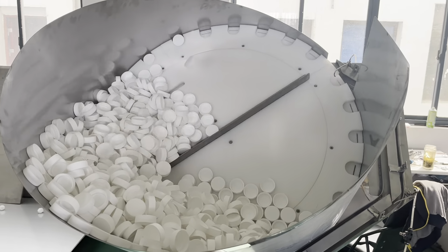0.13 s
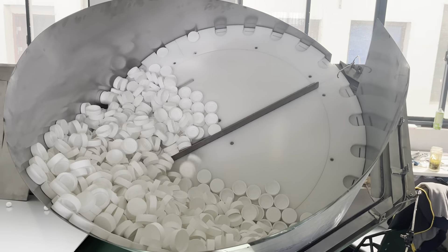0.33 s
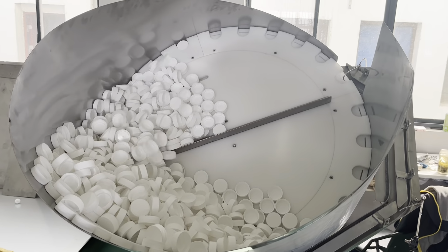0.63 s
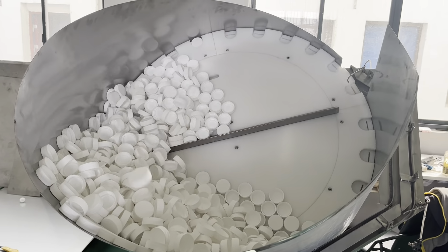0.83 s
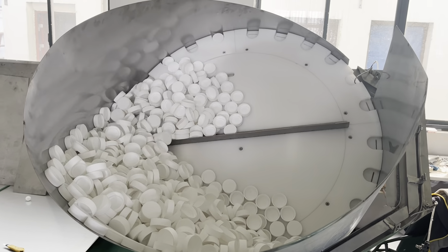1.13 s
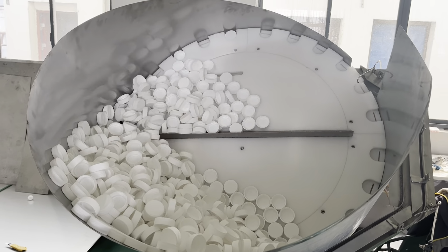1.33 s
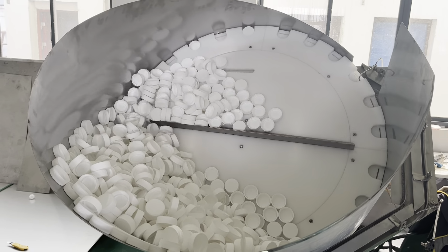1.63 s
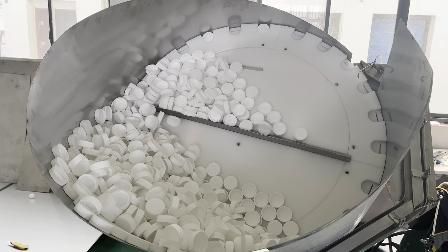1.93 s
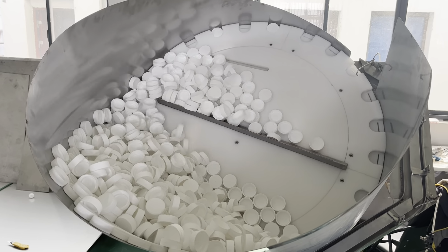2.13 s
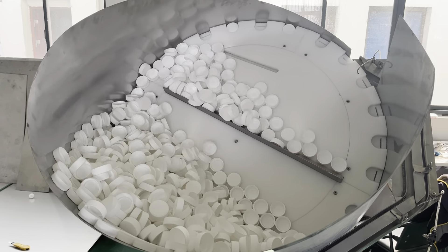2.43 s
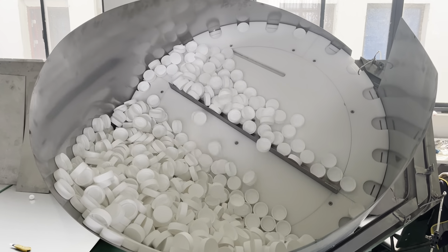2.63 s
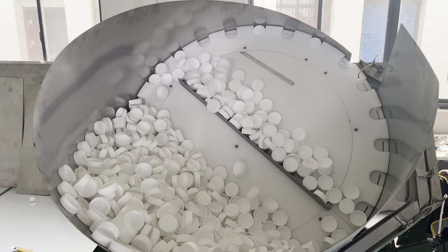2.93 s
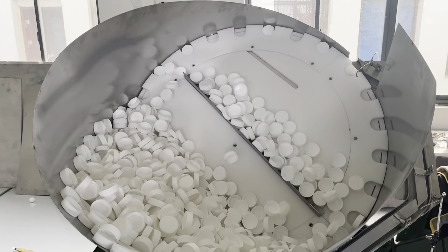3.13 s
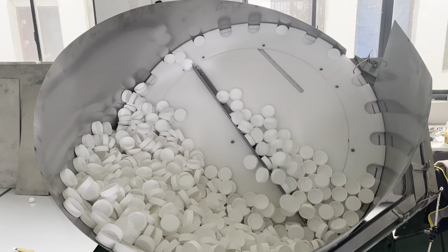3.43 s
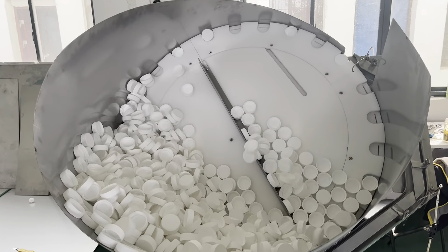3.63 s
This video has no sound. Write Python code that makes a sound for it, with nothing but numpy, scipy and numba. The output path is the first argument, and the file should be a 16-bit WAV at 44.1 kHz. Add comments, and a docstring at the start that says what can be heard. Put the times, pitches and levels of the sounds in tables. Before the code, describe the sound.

Plastic caps click and tumble in a metal feeder over steady hiss, machine drone and air puffs twice a second. Low wind buffeting peaks around one second, then a dense cap cascade; close phone microphone, short room echo.

```python
"""A pulsing air jet, a steady hiss and plastic caps rattling in a steel bowl are heard from the start.
A slowly turning tilted disc tumbles the caps: hundreds of small taps a second, each a short dying sine,
with single drops, sharp ticks and dull knocks on top. The air and the workshop's drone are coloured noise.
The drive whines as two faint sines, and gusts buffet the two ports of a phone held close by as low noise
and thumps."""
import sys
import numpy as np
from scipy import signal
from scipy.fft import rfft, irfft, next_fast_len
from scipy.io import wavfile
from scipy.ndimage import uniform_filter1d
from numba import njit

SR = 44100
rng = np.random.default_rng(int(sys.argv[2]) if len(sys.argv) > 2 else 0)


def dump(signal):
    """Clip the signal to [-1, 1] and save it as 16-bit WAV at the path in sys.argv[1]."""
    limited = np.clip(np.atleast_2d(signal).T, -1, 1)
    pcm = np.round(limited * 32767).astype(np.int16)
    wavfile.write(sys.argv[1], SR, pcm)


N = 167139  # length in samples

# steady hiss and workshop drone, coloured by pitch: (frequency [Hz], relative level [dB per Hz])
DRONE_COLOUR = [(30, -21), (70, -8.5), (140, -10.5), (210, -6.5), (300, -8), (500, -11.5), (800, -14.5),
                (1250, -8), (1550, -11), (1750, -10.5), (2100, -13.5), (2700, -10), (3000, -11),
                (5800, -15.5), (8300, -18), (11400, -12.5), (14500, -22), (16000, -14)]
DRONE_DB, DRONE_SWELL_DB, DRONE_FLICKER_DB = -25, -0.16, 1.5
# level of the high treble: (time [s], level [dB])
TREBLE_LEVEL = [(0.0, -33), (0.02, -32), (0.45, -23.5), (0.46, -31), (1.17, -25), (1.23, -35), (1.42, -28),
                (1.7, -31), (2.12, -25.5), (2.25, -28.5), (2.53, -24), (2.57, -34), (2.79, -32),
                (2.86, -26), (3.18, -34), (3.66, -27), (3.76, -43), (3.79, -32)]
TREBLE_HZ, TREBLE_WIDTH_HZ = 14360, 4000
# drive whine before it wavers and swells: (pitch [Hz], rms level [dB])
WHINE_TONES = [(2713, -42.5), (5426, -54)]
WHINE_WAVER_DB = -3
# slow rise and fall of the whine: (time [s], gain [dB])
WHINE_SWELL_LEVEL = [(0, 0), (1.1, -3), (1.4, 2.5), (2.8, 5.5), (3.79, -1)]

# pulsed air jet: (valve opens [s], valve starts to shut [s], level before waver [dB])
JET_PULSES = [(-.2, 0.032, -24.5), (0.204, 0.66, -24), (0.854, 1.204, -24.5), (1.385, 1.728, -25.5),
              (1.89, 2.246, -24), (2.394, 2.757, -26), (2.918, 3.282, -26), (3.434, 3.9, -26)]
JET_RISE_S, JET_FALL_S, JET_WAVER_DB = 0.03, 0.019, 0.94
# rushing air, coloured by pitch: (frequency [Hz], relative level [dB per Hz])
RUSHING_AIR_COLOUR = [(1000, -20), (2000, -14), (2700, 0), (3000, -13), (3250, 16), (3500, 14),
                      (3700, 10.5), (4400, 6), (5400, 6), (6500, 16), (7300, 18.5), (8400, -3), (9100, 11),
                      (10100, 13), (11300, 5), (13100, 6), (14200, -34), (16000, -39)]

# gusts at the phone: (time [s], level [dB])
GUST_LEVEL = [(0.0, -40), (0.1, -36), (0.15, -47), (0.17, -31), (0.24, -37), (0.28, -23.5), (0.34, -41),
              (0.36, -29.5), (0.58, -28.5), (0.61, -33), (0.71, -23.5), (0.75, -26), (0.79, -20.5),
              (0.86, -24), (0.98, -19.5), (1.02, -22), (1.04, -17), (1.15, -25), (1.19, -23.5), (1.29, -30),
              (1.33, -21.5), (1.5, -32), (1.57, -24.5), (1.76, -33.5), (1.79, -25), (1.87, -41), (2.3, -37),
              (2.35, -27), (2.41, -32), (2.57, -65), (2.88, -34), (3.07, -45), (3.21, -32.5), (3.27, -51),
              (3.42, -31), (3.45, -36), (3.6, -28), (3.68, -45), (3.73, -31.5), (3.79, -47)]
# gust noise, coloured by pitch: (frequency [Hz], relative level [dB per Hz])
GUST_NOISE_COLOUR = [(20, -27), (40, -10), (70, -3), (140, -6), (250, -17.5), (500, -43), (1500, -48)]
GUST_SKEW = 0.22  # how much harder a gust pushes than it pulls
# the hardest buffets: (time [s], starting level [dB], pitch [Hz])
GUST_THUMPS = [(.78, -12, 75), (0.932, -10, 68), (0.959, -7, 72.5), (1.036, -11.5, 75), (1.105, -17, 68.3),
               (1.179, -11, 65.4), (1.218, -19, 69), (0.689, -17, 70)]
THUMP_CYCLES = 11.5  # every count of cycles is the time to die by 60 dB

# loudness of the tumbling heap's main taps: (time [s], level [dB])
TUMBLE_LEVEL = [(0.0, -28), (0.18, -45), (0.24, -28), (0.26, -33.5), (0.76, -32), (0.8, -26), (0.83, -33),
                (1.375, -34.5), (1.39, -23), (1.4, -34), (1.98, -36.5), (2.0, -35), (2.15, -33.5),
                (2.25, -28), (2.27, -41), (2.33, -27), (2.34, -37), (3.11, -27), (3.13, -31), (3.15, -21),
                (3.19, -34), (3.22, -17.5), (3.25, -24), (3.27, -29), (3.3, -23), (3.35, -27),
                (3.39, -28.5), (3.54, -25), (3.62, -33.5), (3.72, -23), (3.76, -34), (3.79, -25)]
TAPS_PER_S, TAP_SPREAD_DB, TAP_MAX_DB = 800, 4.5, 10
TAP_HZ, TAP_HZ_SPREAD, TAP_LOWEST_HZ, TAP_CYCLES = 2335, 0.19, 1690, 15.4
TAP_BRIGHT_HZ, TAP_BRIGHT_DB = 4720, -12  # upper mode, strongest in hard taps
CONTACT_S = 0.00016
# the bowl's hollow answer to the sliding heap: (time [s], level [dB])
BOWL_LEVEL = [(0.0, -42), (0.32, -34), (0.57, -40), (0.6, -28), (0.94, -34), (1.31, -39), (1.33, -35),
              (1.36, -33), (1.69, -37), (1.91, -30.5), (1.97, -35.5), (2.41, -34.5), (2.5, -41.5),
              (2.65, -31.5), (2.72, -37), (2.75, -29.5), (2.93, -31), (2.97, -29), (3.2, -33), (3.21, -38),
              (3.22, -32), (3.27, -36), (3.29, -28.5), (3.37, -31.5), (3.62, -32.5), (3.79, -30)]
# pitches at which the bowl rings: (middle pitch [Hz], relative level [dB])
BOWL_RINGS = [(200, -7), (415, -3), (650, 1.5), (830, -4), (1030, -2.5), (1250, 0)]
BOWL_HZ_SPREAD, BOWL_CYCLES = 0.084, 17.6
BOWL_EVENNESS = 0.57  # 0 keeps the loud and soft taps apart, 1 makes them equal

# dull knocks, levels before contact softening and filtering:
# (time [s], level [dB], pitch [Hz], rattle against level [dB], overtones against level [dB])
DULL_KNOCKS = [(0.229, -15, 404, -3, -11), (0.534, -21.5, 225, -3, -1), (0.546, -17.5, 350, -11, -13),
               (0.601, -17.5, 436, 4.5, -2), (0.623, -16, 243, -11, -6), (0.662, -14, 594, -9, -12),
               (0.678, -20, 570, -8, -12), (0.791, -21.5, 318, 8, -10), (1.031, -22, 183, -8, -3),
               (1.07, -6.5, 164.5, -14, -2.5), (1.113, -22, 570, -10, -14), (1.164, -8, 158.4, -19, -9.5),
               (1.323, -9, 253, 0.5, -6), (1.534, -10, 249, -19, -6), (1.565, -11.5, 220, -21, -8),
               (1.628, -18, 250, -12, -7), (1.66, -16, 195, -14, -6.5), (1.738, -19, 220, -10, -10),
               (2.34, -14, 250, -8, -14), (2.35, -16, 150, -14, -3), (2.716, -19, 398, -3, -6),
               (2.811, -22, 190, -11, -13), (2.893, -23, 131, -10, -2), (3.205, -16.5, 655, 10.5, -5),
               (3.225, -21, 430, 8, -2), (3.283, -16, 660, 7, -1)]
KNOCK_CYCLES, KNOCK_CONTACT_S = 15.2, 0.0027
KNOCK_RATTLE_HZ, KNOCK_RATTLE_T60_S = 830, 0.18
# overtones of a knock: (multiple of its pitch, relative level [dB])
OVERTONES = [(1.6, -4), (2.5, -0.5), (3.7, -10)]
OVERTONE_CYCLES, OVERTONE_CONTACT_S = 15.7, 0.0014
# sharp ticks on the steel wall: (time [s], level before filtering [dB])
WALL_TICKS = [(0.2333, -19), (3.301, -10.5), (3.6447, -15)]
TICK_T60_S = 0.071
# single caps dropping, crack level before filtering:
# (time [s], starting level [dB], pitch [Hz], bright crack against level [dB])
CAP_DROPS = [(0.2205, -14, 2380, -3), (0.3647, -17, 2350, 5.5), (0.4279, -17.5, 2020, 5),
             (0.5731, -20, 2570, -6), (0.6558, -22, 2400, -8), (0.7272, -11.5, 1830, -13),
             (0.7874, -9.5, 2500, -4), (0.7989, -9, 2380, -2.5), (1.1682, -21, 2700, -6),
             (1.382, -11.5, 2160, 6), (1.3895, -11, 2500, -7), (1.4378, -14, 2640, -10),
             (1.4782, -15, 2700, -9), (1.498, -13, 2680, -4), (1.582, -24, 2710, -8),
             (1.6277, -15, 2300, -13), (1.9015, -12.5, 3360, -4), (1.9992, -11, 2440, -13),
             (2.0362, -12, 2760, -7), (2.05, -9, 4930, -8), (2.0745, -14.5, 2740, 2.5),
             (2.2202, -11, 2530, -7), (2.3291, -16, 2500, -3.5), (2.4427, -16, 3300, -7),
             (2.477, -15, 2590, -9), (2.6032, -14, 2510, -3), (2.6753, -18, 2720, 1),
             (2.832, -25, 2530, -6), (2.8458, -13.5, 2530, -11), (2.8858, -15, 2120, -5),
             (2.9033, -15, 2130, -6), (2.9253, -12, 2250, -11), (2.9608, -9, 2560, -7),
             (3.0127, -13, 1700, -2), (3.03, -12, 2500, -6), (3.0879, -20.5, 2400, -6),
             (3.102, -9.5, 2500, -14), (3.146, -3, 2320, -15), (3.2016, -8.5, 2240, -5),
             (3.209, -6.5, 1930, -9), (3.2165, -7, 2050, -12), (3.2275, -12, 2030, -10),
             (3.243, -14, 2300, -8), (3.2735, -9, 2280, -16), (3.285, -11, 1900, -11),
             (3.293, -10, 1770, -8), (3.306, -13, 2370, -1), (3.319, -11, 2380, -10),
             (3.3389, -12, 1930, -5), (3.3801, -25, 2120, -9), (3.4027, -15, 2280, -10),
             (3.4987, -15, 2040, -7), (3.5892, -17, 2770, -4), (3.6204, -17, 2680, 4), (3.67, -13, 2560, 2)]
CLACK_CYCLES, BOUNCE_S, BOUNCE_DB = 23.8, .0055, -5
SNAP_HZ, SNAP_CYCLES, SNAP_DB = 4300, 8.1, 3  # the first contact, dB against the crack

# how the two ports differ:
# (frequency [Hz], lead of the right [turns], likeness [0-1], left minus right [dB])
PHONE_PORTS = [(0, 0, .95, .3), (400, 0, .85, 3), (1100, -.05, .35, 3), (1300, -.6, .2, 2.5),
               (1600, -.6, .55, 2), (1750, -1, .93, .5), (2400, -1.03, .88, .5), (3100, -1.2, .65, 1),
               (4600, -1.12, .45, 1.5), (5200, -.95, .2, 1.5), (6000, -.82, .75, 1), (8400, -.5, .97, 0),
               (10100, -.25, .82, 0), (11900, 0, .97, 0), (13600, .25, .84, 0), (15500, .5, .97, 0),
               (22050, 1.4, .9, 0)]
SCATTER_T60_S, ROOM_T60_S, ROOM_DB = 0.067, 0.084, -6
LOW_CUT_HZ, TOP_HZ = 37, 15400


def undb(db):
    """Turn dB into a gain."""
    return 10 ** (np.asarray(db) / 20)


def unit(x):
    """Scale to an rms of 1."""
    return x / np.sqrt(np.mean(x ** 2))


def curve(rows):
    """Draw a gain line through (time [s], level [dB]) rows."""
    rows = np.array(rows)
    return undb(np.interp(np.arange(N) / SR, rows[:, 0], rows[:, 1]))


def walk(rate):
    """Wander smoothly: random levels held 1 / rate seconds, smoothed twice, with a spread near 1."""
    hold = int(SR / rate)
    steps = np.repeat(rng.standard_normal(N // hold + 1), hold)
    return 1.53 * uniform_filter1d(uniform_filter1d(steps, hold), hold)[:N]


def band(x, hz, width_hz):
    """Keep mostly the sound near one pitch, as a resonance does."""
    return signal.lfilter(*signal.iirpeak(hz, hz / width_hz, fs=SR), x)


def hiss(colour, flicker_db=0., rate=12.):
    """Two unrelated coloured noises, rms 1; bands two thirds of an octave apart can flicker on their own."""
    n = next_fast_len(N)
    f = np.fft.rfftfreq(n, 1 / SR) + 1
    colour = np.array(colour)
    gain = undb(np.interp(np.log(f), np.log(colour[:, 0]), colour[:, 1]))
    spec = rfft(rng.standard_normal((2, n))) * gain
    if not flicker_db:
        return unit(irfft(spec, n)[:, :N])
    place = 1.5 * np.log2(f / 30)  # band number, counted up from 30 Hz
    out = np.zeros((2, N))
    for k in range(15):
        one_band = irfft(spec * np.clip(1 - abs(place - k), 0, 1), n)[:, :N]
        out += undb(flicker_db * walk(rate)) * one_band
    return unit(out)


@njit
def rings(n, at, step, cycles, size, soft):
    """Each hit is a sine that swells over the contact and dies 60 dB in the given number of cycles."""
    out = np.zeros(n)
    for k in range(len(at)):
        turn = np.exp(step[k] * (2j * np.pi - np.log(1000.) / cycles))
        z = size[k] + 0j
        unrisen = 1.
        for i in range(max(at[k], 0), min(n, at[k] + int(cycles / step[k]))):
            out[i] += z.imag * (1 - unrisen)
            z *= turn
            unrisen *= soft
    return out


def ring(t, hz, cycles, size, contact_s=CONTACT_S):
    """Dying sines at times t; a longer contact gives a softer start."""
    soft = np.exp(-1 / (contact_s * SR))
    return rings(N, (t * SR).astype(np.int64), hz / SR, float(cycles), size, soft)


def burst(t, db, t60_s):
    """Noise that starts suddenly and dies 60 dB in t60_s."""
    spikes = np.zeros(N)
    np.add.at(spikes, (t * SR).astype(int), undb(db))
    fade = np.exp(-np.log(1000) / (t60_s * SR))
    return signal.lfilter([1], [1, -fade], spikes) * rng.standard_normal(N)


def tail(t60_s):
    """Dying noise of energy 1, made even across all pitches."""
    n = int(t60_s * SR)
    h = rng.standard_normal(n) * np.exp(-np.log(1000) * np.arange(n) / n)
    h = irfft(np.exp(1j * np.angle(rfft(h, 4 * n))), 4 * n)[:2 * n]  # keep only the phases
    return h / np.sqrt(np.sum(h ** 2))


def drone_and_hiss():
    """Steady air and workshop drone: flickering coloured noise with a slight swell."""
    level = undb(DRONE_DB + DRONE_SWELL_DB * walk(3.0))
    return level * hiss(DRONE_COLOUR, flicker_db=DRONE_FLICKER_DB, rate=14)


def treble():
    """High noise, narrowed twice by a resonance, whose level rises and falls."""
    top = rng.standard_normal((2, N))
    for _ in range(2):
        top = band(top, TREBLE_HZ, TREBLE_WIDTH_HZ)
    return unit(top) * curve(TREBLE_LEVEL)


def drive_whine():
    """The drive's two steady pitches, each wavering in level, a quarter turn apart in the two parts."""
    t = np.arange(N) / SR
    out = np.zeros((2, N))
    for hz, db in WHINE_TONES:
        level = np.sqrt(2) * undb(db + WHINE_WAVER_DB * walk(2.73))
        out += level * np.sin(2 * np.pi * hz * t + [[0], [np.pi / 2]])
    return out * curve(WHINE_SWELL_LEVEL)


def pulsed_jet():
    """A valve lets air rush out in pulses: flickering noise that rises steadily and dies away."""
    t = np.arange(N) / SR
    valve = np.zeros(N)
    for on, off, db in JET_PULSES:
        opening = np.clip((t - on) / JET_RISE_S, 0, 1)
        shutting = np.exp(-np.clip(t - off, 0, None) / JET_FALL_S)
        valve += undb(db) * opening * shutting
    return valve * undb(JET_WAVER_DB * walk(12)) * hiss(RUSHING_AIR_COLOUR, flicker_db=1.4, rate=22)


def gusts():
    """Moving air buffets the ports: low noise that pushes harder than it pulls, plus low thumps."""
    x = hiss(GUST_NOISE_COLOUR)
    x = x / np.sqrt(uniform_filter1d(x ** 2, size=3000) + 0.05)  # even out the loudness
    x = x + GUST_SKEW * (x ** 2 - uniform_filter1d(x ** 2, size=1500))
    t, db, hz = np.array(GUST_THUMPS).T
    thumps = ring(t, hz, THUMP_CYCLES, undb(db))
    return unit(x) * curve(GUST_LEVEL) + thumps * [[1], [0]]  # thumps in the shared part only


def tumbling_heap():
    """Caps tap each other at random; the same taps set off the hollow, lower ringing of the bowl."""
    when, chance, side = rng.random((int(TAPS_PER_S * N / SR), 3)).T
    t = when * N / SR
    pitch, other_pitch = rng.standard_normal((len(t), 2)).T
    size_db = np.minimum(-TAP_SPREAD_DB * np.log(chance + 1e-9), TAP_MAX_DB)
    size = undb(size_db) * np.sign(side - .5)

    tap_hz = np.maximum(TAP_HZ * np.exp(TAP_HZ_SPREAD * pitch), TAP_LOWEST_HZ)
    taps = unit(ring(t, tap_hz, TAP_CYCLES, size))
    bright_hz = TAP_BRIGHT_HZ * np.exp(0.19 * other_pitch)
    taps = taps + undb(TAP_BRIGHT_DB) * unit(ring(t, bright_hz, TAP_CYCLES, size ** 2))

    # each tap rings one bowl pitch picked at random
    hz, db = np.array(BOWL_RINGS)[rng.integers(len(BOWL_RINGS), size=len(size))].T
    evened = size * abs(size) ** -BOWL_EVENNESS * undb(db)
    bowl = unit(ring(t, hz * np.exp(BOWL_HZ_SPREAD * other_pitch), BOWL_CYCLES, evened))
    return taps * curve(TUMBLE_LEVEL) + bowl * curve(BOWL_LEVEL)


def dull_knocks():
    """Soft, long contacts sound low pitches with overtones, and a burst of noise rattles along."""
    t, db, hz, rattle_db, over_db = np.array(DULL_KNOCKS).T
    out = ring(t, hz, KNOCK_CYCLES, undb(db), KNOCK_CONTACT_S)
    out = out + band(burst(t, db + rattle_db, KNOCK_RATTLE_T60_S), KNOCK_RATTLE_HZ, 820)
    for ratio, rel_db in OVERTONES:
        size = undb(db + over_db + rel_db)
        out = out + ring(t, ratio * hz, OVERTONE_CYCLES, size, OVERTONE_CONTACT_S)
    return out


def wall_ticks():
    """Sharp hits on the steel wall: short bursts of bright noise."""
    t, db = np.array(WALL_TICKS).T
    return band(burst(t, db, TICK_T60_S), 9000, 9700)


def cap_drops():
    """A cap lands with a snap and a crack of noise, and rings again, more softly, at four bounces."""
    t, db, hz, crack_db = np.array(CAP_DROPS).T
    timing, detune = rng.random((2, 5, len(t)))
    out = np.zeros(N)
    for k in range(5):  # 0 is the landing itself
        late = t + k * BOUNCE_S * (.5 + timing[k])
        bounce_hz = hz * (1 + 0.097 * k * (detune[k] - .5))
        out += ring(late, bounce_hz, CLACK_CYCLES, undb(db + k * BOUNCE_DB))
    crack = band(burst(t, db + crack_db, 0.022), 2360, 4400)
    snap = ring(t, SNAP_HZ + 0 * t, SNAP_CYCLES, undb(db + crack_db + SNAP_DB))
    return out + crack + snap


def at_ports(shared, scattered):
    """Mix both parts into left and right, with a likeness, lag and level gap that depend on pitch."""
    hz, turns, like, lr_db = np.array(PHONE_PORTS).T
    n = next_fast_len(N)
    f = np.fft.rfftfreq(n, 1 / SR)
    turns = np.interp(f, hz, turns)
    like = np.interp(f, hz, np.clip(like, 0, 1))
    lr_db = np.interp(f, hz, lr_db)
    same = rfft(shared, n) * np.sqrt((1 + like) / 2)
    other = rfft(scattered, n) * np.sqrt((1 - like) / 2)
    half = np.exp(1j * np.pi * turns) / undb(lr_db / 2)  # half the lag and level gap on each side
    return irfft(np.array([(same + other) / half, (same - other) * half]), n)[:, :N]


def scene():
    """Air, drone, whine, gusts and caps reach both ports; the caps also get a short room echo."""
    air = drone_and_hiss() + treble() + drive_whine() + pulsed_jet() + gusts()
    hits = tumbling_heap() + dull_knocks() + wall_ticks() + cap_drops()
    hits = hits + undb(ROOM_DB) * signal.fftconvolve(hits, tail(ROOM_T60_S))[:N]
    scattered_hits = signal.fftconvolve(hits, tail(SCATTER_T60_S))[:N]
    shared, scattered = air + [hits, scattered_hits]
    return at_ports(shared, scattered)


def record(dry):
    """The phone cuts the deep bass and the top."""
    low_cut = signal.butter(3, LOW_CUT_HZ, "high", fs=SR, output="sos")
    top_cut = signal.ellip(10, .2, 80, TOP_HZ, fs=SR, output="sos")
    return signal.sosfilt(top_cut, signal.sosfilt(low_cut, dry))


dry = scene()
out = record(dry)
dump(out)
```